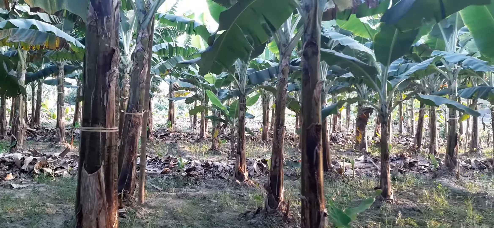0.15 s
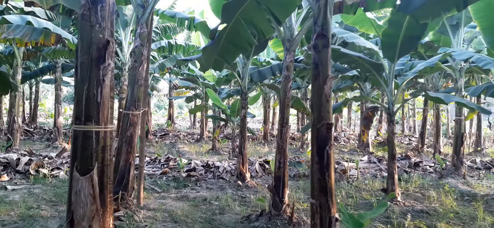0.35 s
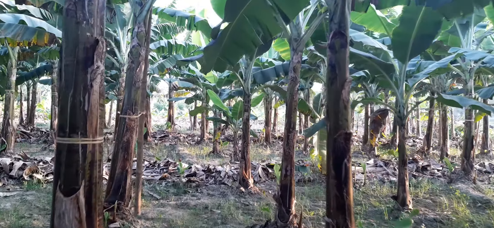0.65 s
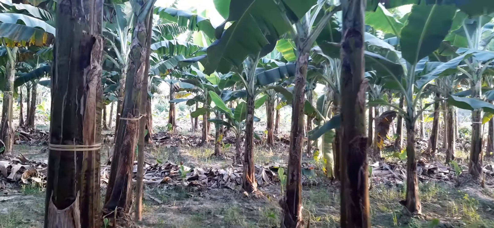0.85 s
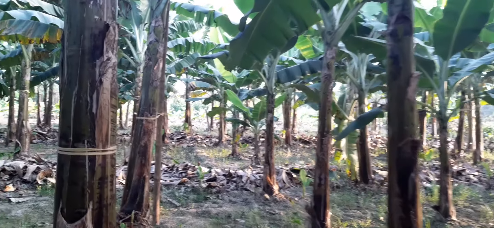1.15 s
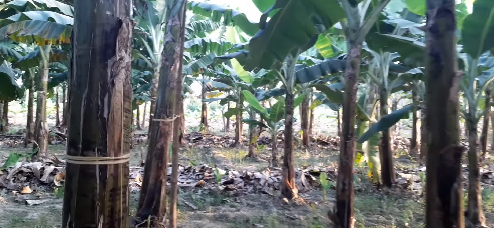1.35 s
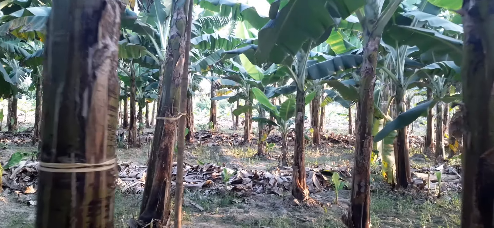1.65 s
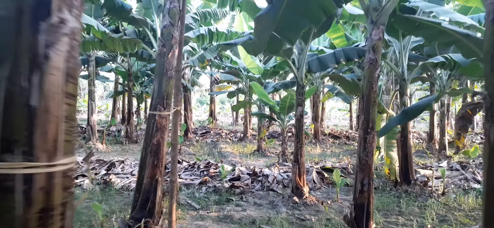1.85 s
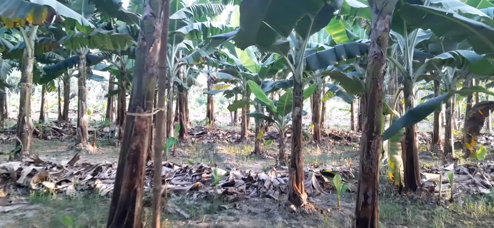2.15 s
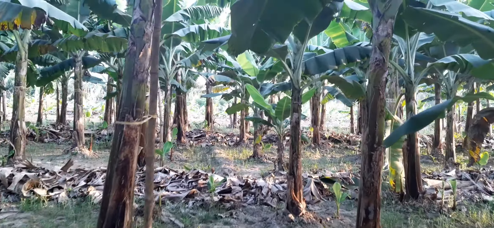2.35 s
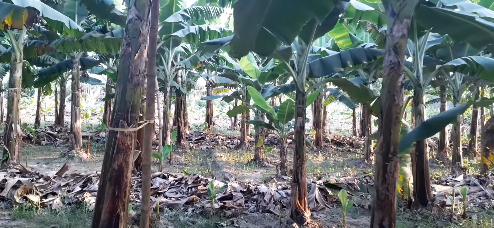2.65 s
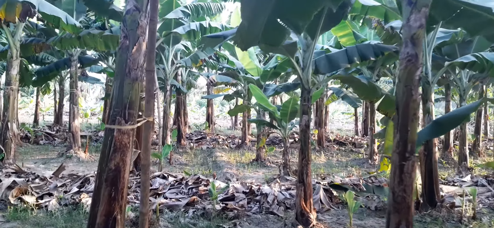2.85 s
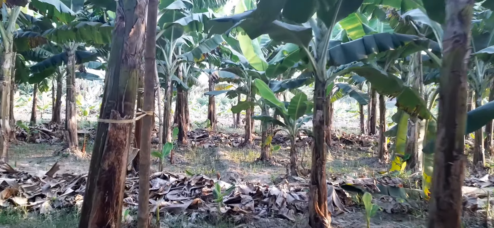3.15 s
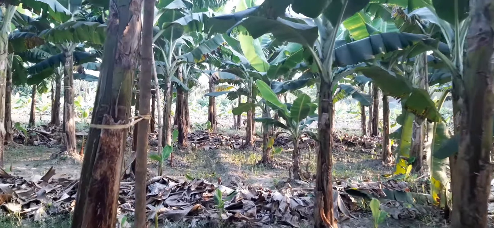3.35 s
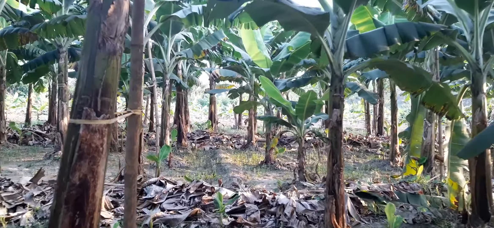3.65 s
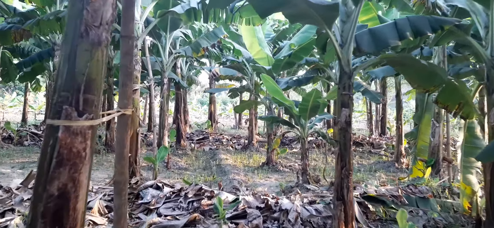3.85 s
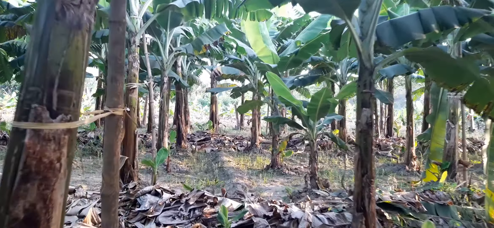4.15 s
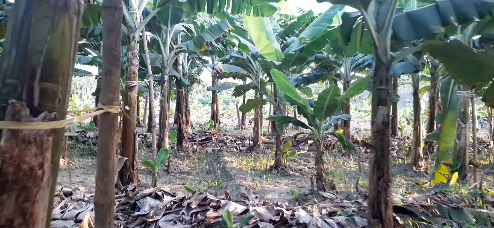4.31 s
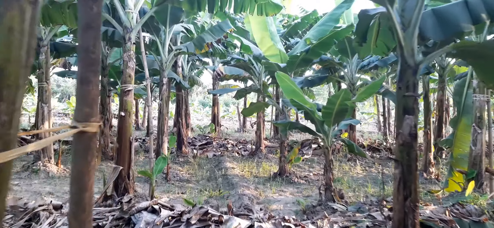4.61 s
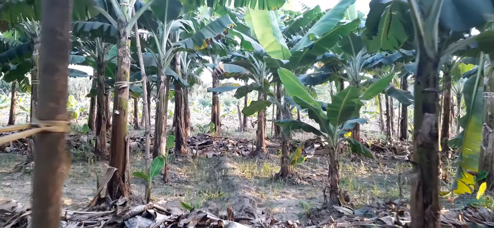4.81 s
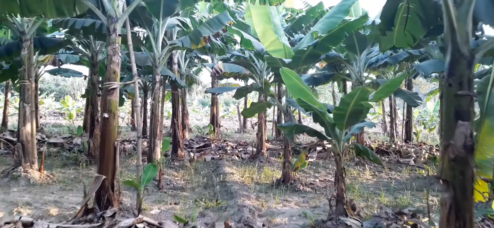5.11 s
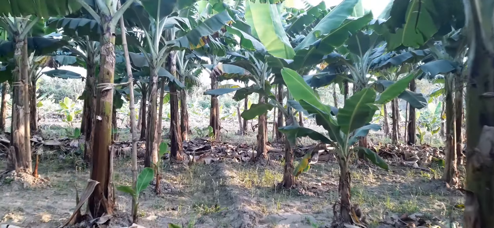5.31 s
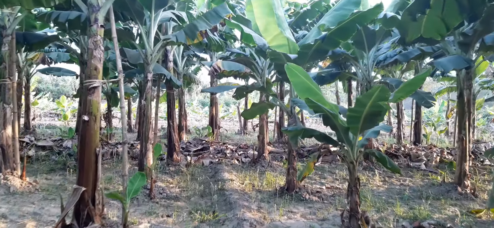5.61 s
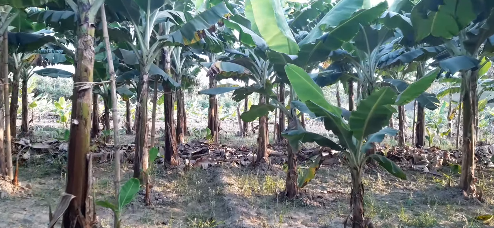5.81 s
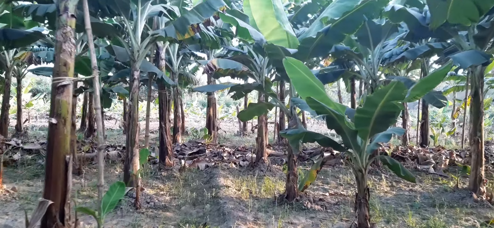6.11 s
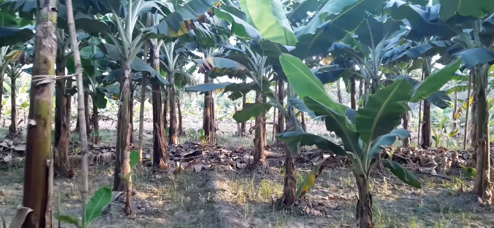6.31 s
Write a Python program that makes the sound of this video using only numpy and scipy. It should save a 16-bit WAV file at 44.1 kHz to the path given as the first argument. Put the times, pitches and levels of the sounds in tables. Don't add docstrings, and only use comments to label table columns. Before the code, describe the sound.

Feet wade through thick dry leaves, a quiet start bursting into loud crackling, snapping crunches, then thinning to softer uneven rustles in a banana plantation.

```python
import sys
import numpy as np
from scipy import signal
from scipy.fft import rfft, irfft, next_fast_len
from scipy.io import wavfile
from scipy.ndimage import map_coordinates

SR = 44100
rng = np.random.default_rng(int(sys.argv[2]) if len(sys.argv) > 2 else 0)


def materialize(psi):
    bounded = np.clip(np.atleast_2d(psi).T, -1, 1)
    quanta = np.round(bounded * 32767).astype(np.int16)
    wavfile.write(sys.argv[1], SR, quanta)


def gain_from_db(level_db):
    decades = np.asarray(level_db, float) / 20
    return 10 ** decades


N = 285327

# peak time in seconds, crackle level in dB,
# rise and fall in seconds per 20 dB.
HEAP_SURGES = [(1.018, -40.5, 0.014, 0.3), (1.096, -25.0, 0.045, 0.062), (1.169, -37.5, 0.025, 0.041),
               (1.231, -48.0, 0.018, 0.074), (1.393, -49.5, 0.072, 0.13), (1.46, -44.5, 0.036, 0.19),
               (1.542, -42.5, 0.12, 0.14), (1.66, -47.5, 0.049, 0.074), (1.782, -31.0, 0.061, 0.29),
               (1.843, -20.5, 0.079, 0.12), (1.909, -20.5, 0.16, 0.065), (2.004, -31.5, 0.036, 0.18),
               (2.041, -23.5, 0.029, 0.12), (2.085, -24.0, 0.074, 0.084), (2.188, -26.0, 0.087, 0.14),
               (2.3, -28.5, 0.084, 0.079), (2.384, -35.5, 0.099, 0.064), (2.488, -30.5, 0.24, 0.062),
               (2.576, -39.0, 0.07, 0.13), (2.68, -31.0, 0.017, 0.33), (2.731, -22.0, 0.07, 0.27),
               (2.859, -25.5, 0.06, 0.13), (2.95, -20.0, 0.042, 0.21), (2.995, -21.5, 0.069, 0.2),
               (3.2, -41.0, 0.13, 0.08)]
LITTER_SURGES = [(.19, -64.5, .035, .25), (.363, -64, .09, .12), (.507, -64.5, .12, .15),
                 (3.471, -46.5, .32, .12), (3.618, -47, .23, .7), (3.75, -47, .08, .3),
                 (3.855, -33.5, .075, .19), (4.03, -40, .17, .34), (4.183, -46, .13, .21),
                 (4.37, -54, .05, .4), (4.485, -45, .03, .12), (4.55, -54, .02, .12),
                 (4.689, -55, .07, .69), (4.85, -49, .15, .2), (5.003, -41.5, .36, .37),
                 (5.134, -33.5, .1, .24), (5.339, -47, .14, .26), (5.531, -52.5, .055, .7),
                 (5.615, -47.5, .022, .4), (5.72, -45.5, .12, .1), (5.785, -35.5, .04, .105),
                 (6.01, -56, .07, .15), (6.07, -48.5, .19, .16), (6.2, -57, .1, .3),
                 (6.298, -57, .012, .07), (6.405, -61, .02, .08)]
SURGE_DB, STIR_DB = -2.5, -83
# time in seconds, folds re crackle in dB,
# bed re crackle in dB.
UNDERFOOT = [(0, 12, 15), (.2, 2, -5), (.38, 9, 6), (.58, 2, 3), (.8, 14, 11), (1.05, 2, -3),
             (1.5, 2.5, -6), (1.9, 4, -7), (2.4, 3, -9), (2.72, 1, -2), (3.0, 1.5, -12), (3.3, 6.5, -1),
             (4.1, 7, -1), (4.7, 3, -6), (5.2, -1, -3), (5.7, 3, 2), (5.9, -4, -5), (6.3, 8, 5)]
# frequency in Hz, density in dB per Hz.
FLAKE_SPECTRUM = [(900, -64), (1800, -3), (2600, -3.5), (4300, -6), (7300, -10.5), (8400, -7.5),
                  (10000, -10), (12500, -7.5), (15500, -15)]
# frequency in Hz, gain in dB.
BLADE_COLOUR = [(250, -11), (500, -1), (680, -2), (830, 2), (1020, -1.5), (1400, 0.5), (1900, -1),
                (2600, 0.5), (4000, -6), (8000, -12.5)]
# frequency in Hz, density in dB per Hz.
BED_SPECTRUM = [(71, -35), (120, 4), (200, -8), (274, 11), (581, -5), (900, 5.5), (1170, -94), (1980, -120)]

# time in seconds, pitch in Hz, level in dB.
FALLING_CALL = [
    (0, 822, -66),
    (.06, 808, -62),
    (.12, 735, -65),
    (.18, 665, -66),
    (.3, 640, -66),
    (.36, 600, -66),
    (.39, 562, -68),
    (.47, 555, -69),
    (.53, 440, -80),
]
# time in seconds, pitch in Hz, level in dB.
LEVEL_CALL = [
    (.46, 950, -80),
    (.55, 820, -61),
    (.62, 780, -60),
    (.69, 814, -59),
    (.78, 870, -61),
    (.88, 860, -60),
    (.97, 800, -66),
    (1.02, 790, -90),
]
# multiple of the pitch, level in dB, flutter in knots per second.
FALLING_PARTIALS = [(1.07, -6, 80), (2.0, 0, 95)]
# multiple of the pitch, level in dB, flutter in knots per second.
LEVEL_PARTIALS = [(1.0, 0, 110), (1.64, -14, 220), (2.85, -20, 120)]

# frequency in Hz, density in dB per Hz.
RUMBLE_SPECTRUM = [(15, -33), (25, -38), (48, -5), (80, 3), (108, 3), (140, -2), (200, -18), (260, -48),
                   (440, -120)]
# frequency in Hz, density in dB per Hz.
AIR_SPECTRUM = [(88, -64), (150, 1), (270, 5), (601, 1), (805, 3), (1080, -22), (2000, -50), (4160, -27.5),
                (11000, -18.5), (16000, -47)]
# peak time in seconds, level in dB, half length in seconds per 20 dB.
HAND_JOLTS = [(.03, -57, .2), (.4, -56, .2), (.52, -54, .1), (1.12, -53, .2), (1.5, -54, .12),
              (2.0, -50, .1), (4.07, -55, .12), (4.5, -55, .15), (5.57, -54, .1), (1.7, -56, .3),
              (2.45, -54, .3), (3.2, -57, .3), (3.7, -54, .3), (3.95, -52, .5), (4.96, -44, .12),
              (5.3, -53, .7), (5.75, -51, .25), (6.08, -49, .25), (6.36, -55, .12)]
AIR_DB, BREEZE_DB, SHAKE_DB = -66, -63, -31

# time in seconds, peak in dB, blade re peak in dB, t60 in seconds.
RIB_SNAPS = [(1.086, -23, -3.5, .027), (1.1709, -21, -19, .015), (1.5344, -18.5, -12, .014),
             (1.7511, -10, -20, .01), (1.7739, -9, -6, .011), (1.8783, -9, -15, .012),
             (1.9977, -11, -11, .018), (2.0312, -13, -8.5, .011), (2.0444, -7, -5, .008),
             (2.0654, -5, -9, .018), (2.0834, -10, -7, .012), (2.1023, -9, -2, .006), (2.177, -7, -8, .015),
             (2.1828, -7, -3, .011), (2.22, -12, -9, .011), (2.2616, -13, -1, .014), (2.2873, -13, 0, .011),
             (2.2936, -7, -5, .009), (2.32, -12, -13, .007), (2.375, -3.5, -12, .01), (2.446, -10, -3, .01),
             (2.4689, -11, 2, .01), (2.4744, -6, -6, .006), (2.5769, -12, -9, .006),
             (2.6679, -25, 10, .021), (2.7198, -5.5, -20, .02), (2.8373, -8.5, -1, .013),
             (2.8557, -5, -6.5, .007), (2.937, -14, -4, .015), (3.022, -6.5, -12, .007)]
# time in seconds, peak in dB, blade re peak in dB.
LONE_TWIGS = [(.174, -56, -8), (.6699, -55, -3), (.839, -54, -7), (1.002, -43, -2), (.356, -54, 8),
              (1.2285, -33, -9.5), (1.3339, -36, -15), (1.3753, -33, -7), (1.3816, -24, -7),
              (1.4123, -32, -4), (1.449, -22, -11), (1.4927, -32, 4), (1.5137, -26, -14),
              (1.5635, -27.5, -7), (1.5738, -25, -8), (1.602, -25, -14.5), (1.6994, -30, -7.5),
              (2.4076, -22, -20), (2.4177, -15, -18), (2.429, -13, -10), (2.5511, -21, -2),
              (2.881, -13, -4.5), (3.4627, -31, 3.5), (3.9144, -20.5, -3), (4.004, -28, 0),
              (4.4767, -36, 3), (5.7642, -24.5, -9), (6.1097, -40, 2), (6.2938, -41, -5), (6.394, -43, -7)]
# frequency in Hz, gain in dB.
RIB_COLOUR = [(500, -9), (1500, -3), (3000, -0.5), (5000, -9), (9000, -6.5), (13000, -6.5), (16000, -18)]
TWIG_T60_S = .013

# time in seconds, peak in dB.
LEAF_CRUNCHES = [(0.351, -41), (0.399, -49), (0.483, -38), (1.001, -33), (1.16, -21), (1.382, -32),
                 (3.25, -27), (3.346, -36), (3.376, -32), (3.416, -31), (3.539, -35), (3.6, -33),
                 (3.656, -32), (3.693, -30), (3.721, -32), (3.831, -21), (4.004, -21), (4.08, -25),
                 (4.182, -31), (4.28, -35), (4.364, -38), (4.424, -41), (4.542, -31), (4.851, -30),
                 (4.935, -31), (5.465, -38), (5.603, -37), (5.656, -35), (5.685, -33), (6.165, -38)]
# frequency in Hz, gain in dB.
CRUNCH_COLOUR = [(150, -20), (300, -4), (800, 0), (1500, -3), (3000, -12), (6000, -30)]
CRUNCH_DB, CRUNCH_T60_S = 1.5, .045

# time in seconds, peak in dB, ring in Hz, t60 in seconds.
HOLLOW_POPS = [(.356, -34.5, 767, .011), (.482, -29, 807, .012), (1.0, -33.5, 619, .028),
               (1.086, -26.5, 840, .069), (1.16, -20, 806, .019), (1.428, -38, 813, .034),
               (1.484, -30, 790, .019), (1.644, -34, 870, .025), (1.689, -28, 895, .029),
               (1.732, -32, 1710, .025), (1.772, -14.5, 920, .015), (1.996, -16, 1900, .022),
               (2.066, -5, 1600, .011), (2.184, -16.5, 510, .052), (2.294, -12, 1530, .013),
               (2.364, -13, 2300, .0094), (2.445, -19, 646, .019), (2.666, -16.5, 730, .025),
               (2.837, -13, 1210, .015), (3.251, -21, 1130, .022), (3.415, -29, 670, .019),
               (3.599, -34, 920, .025), (4.004, -22, 540, .033), (4.183, -32, 1050, .025),
               (4.542, -32, 600, .011), (4.851, -36, 600, .03), (5.602, -38, 776, .037),
               (5.685, -24, 400, .009), (6.176, -43, 700, .01), (6.328, -19.5, 860, .008)]
# time in seconds, peak in dB, ring in Hz.
LITTER_LUMPS = [(3.204, -25, 1380), (3.272, -28, 528), (3.317, -35, 304), (3.391, -35, 821),
                (3.466, -31, 810), (3.694, -30, 993), (3.747, -32, 762), (3.789, -30, 834),
                (3.844, -21, 840), (3.894, -21, 1040), (3.916, -22, 837), (4.044, -24, 807),
                (4.057, -24, 678), (4.084, -28, 810), (4.209, -33, 816), (4.301, -39, 764),
                (4.336, -44, 301), (4.363, -40, 770), (4.423, -40, 851), (4.481, -33, 681),
                (4.524, -34, 536), (4.552, -43, 576), (4.741, -43, 301), (4.934, -30, 323),
                (4.954, -33, 810), (5.134, -28, 832), (5.154, -29, 716), (5.334, -37, 703),
                (5.464, -37, 853), (5.794, -34, 301), (6.007, -41, 301), (6.109, -37, 374),
                (6.141, -43, 320), (6.232, -42, 380), (6.271, -44, 721)]
LUMP_DB, LUMP_CYCLES = 0.5, 13

# peak time in seconds, level in dB, hollow in Hz,
# half length in seconds.
LEAF_DRAGS = [(0.51, -57, 220, 0.04), (1.094, -37, 560, 0.06), (1.817, -30, 300, 0.075),
              (1.834, -26, 940, 0.06), (1.873, -25, 1940, 0.06), (1.883, -23, 1100, 0.045),
              (1.916, -27, 1940, 0.045), (2.047, -25, 1600, 0.045), (2.084, -26, 1600, 0.018),
              (2.104, -25, 1060, 0.013), (2.162, -32, 1480, 0.03), (2.239, -35, 750, 0.018),
              (2.293, -29, 2160, 0.018), (2.376, -25, 2580, 0.011), (2.43, -33, 1410, 0.013),
              (2.474, -28, 2070, 0.023), (2.492, -34, 1500, 0.013), (2.505, -36, 1300, 0.013),
              (2.603, -41, 1130, 0.011), (2.635, -45, 2500, 0.038), (2.673, -34, 260, 0.018),
              (2.715, -33, 800, 0.075), (2.794, -34, 300, 0.12), (2.809, -31, 750, 0.06),
              (2.884, -30, 750, 0.045), (2.961, -32, 370, 0.075), (2.986, -27, 750, 0.075),
              (2.992, -28, 2290, 0.045), (3.039, -28, 750, 0.06), (3.105, -33, 950, 0.06),
              (3.148, -36, 850, 0.105), (3.276, -42, 600, 0.045), (3.773, -45, 900, 0.105),
              (3.847, -36, 790, 0.045), (3.916, -34, 790, 0.038), (4.008, -36, 560, 0.023),
              (4.04, -37, 780, 0.06), (4.086, -37, 730, 0.038), (4.121, -43, 1130, 0.045),
              (4.209, -45, 970, 0.045), (4.853, -45, 810, 0.03), (4.95, -44, 520, 0.06),
              (4.961, -47, 120, 0.09), (5.132, -44, 700, 0.075), (5.165, -48, 280, 0.105),
              (5.26, -49, 240, 0.075), (5.643, -53, 250, 0.06), (5.692, -45, 240, 0.045),
              (5.796, -45, 260, 0.045), (6.01, -50, 260, 0.105)]
DRAG_DB, DRAG_EDGE_DB = -2, 14
DRAG_WIDTH, DRAG_RISE, DRAG_TAIL = .4, .5, 1.3

# time in seconds, peak in dB.
FLAKE_TICKS = [(0.9787, -48), (1.0251, -30), (1.1144, -21), (1.1603, -25), (1.2585, -39), (1.3169, -44),
               (1.3339, -38), (1.3644, -31), (1.4794, -37), (1.5894, -32), (1.6452, -34), (1.6594, -39),
               (1.7115, -28), (1.7344, -15), (1.8074, -16), (1.9244, -20), (2.1444, -21), (2.5994, -41),
               (2.7394, -19), (3.0894, -21), (3.2044, -33), (3.4526, -33), (4.3645, -47), (4.4994, -46),
               (4.9494, -38), (5.0994, -30), (5.5994, -41), (6.0561, -42), (6.4028, -47)]
# frequency in Hz, gain in dB.
TICK_COLOUR = [(2500, -30), (5000, -6), (8000, 0), (13000, 0), (16000, -6)]
TICK_DB, TICK_T60_S = -3, .008

# frequency in Hz, t60 in seconds.
TRUNK_DECAY = [(200, 0.1), (1500, .16), (6000, 0.11), (15000, 0.13)]
# frequency in Hz, gain in dB.
MIC_RESPONSE = [(40, -41), (120, -7), (200, 0), (300, 1)]
# frequency in Hz, gain in dB.
BAND_LIMIT = [(15800, 0), (15980, -36), (16850, -42), (17000, -100)]


def unit(x):
    return x / np.sqrt(np.mean(x ** 2) + 1e-20)


def along(points, hz):
    f, v = np.transpose(points)
    return np.interp(np.log(hz + 1), np.log(f + 1), v)


def curves(rows):
    s, *cols = np.transpose(rows)
    return [np.interp(np.arange(N) / SR, s, c) for c in cols]


def wobble(rate):
    return map_coordinates(rng.standard_normal(N // 100), [np.arange(N) * rate / SR])


def filtered(x, spectrum):
    m = next_fast_len(N + 8192)
    gain = gain_from_db(along(spectrum, np.fft.rfftfreq(m, 1 / SR)))
    return irfft(rfft(x, m) * gain, m)[..., :N]


def coloured(x, spectrum):
    return unit(filtered(x, spectrum))


def noise(alike):
    a, b = rng.standard_normal((2, N))
    turn = np.arccos(np.clip(alike, -1, 1)) / 2
    shared, opposed = np.cos(turn) * a, np.sin(turn) * b
    return np.array([shared + opposed, shared - opposed])


def place(at, shapes, lag, pan_db):
    out = []
    for side in (1, -1):
        start = np.round(at + side * lag / 2).astype(int)
        where = start[:, None] + np.arange(shapes.shape[1])
        gain = gain_from_db(side * pan_db / 2)[:, None]
        port = np.bincount(np.clip(where, 0, N).ravel(), (gain * shapes).ravel(), N + 1)
        out.append(port[:N])
    return np.array(out)


def rings(hz, t60, size):
    t = np.arange(size) / SR
    return np.sin(2 * np.pi * hz[:, None] * t) * gain_from_db(-60 * t / t60[:, None])


def grains(count, size, hz, octaves, cycles, scatter_db, lag, spread, lean_db):
    at, big = rng.random((count, 2)).T
    pitch, way, lean = rng.standard_normal((count, 3)).T
    f = np.clip(hz * 2 ** (octaves * pitch), 80, 15500)
    strength = gain_from_db(-scatter_db * np.log(big + 0.0013)) * np.sqrt(f / hz)
    shapes = rings(f, cycles / f, size) * strength[:, None]
    return unit(place(at * N, shapes, lag + spread * way, lean_db * lean))


def collapses(count, scatter_db, t60):
    at, big = rng.random((count, 2)).T
    strength = gain_from_db(-2 * scatter_db * np.log(big + 0.0089))
    kicks = np.bincount((at * N).astype(int), strength, N)
    power = signal.fftconvolve(kicks, gain_from_db(-120 * np.arange(4000) / SR / t60))[:N]
    return unit(np.sqrt(np.abs(power) + 0.75 * np.mean(power)))


def swells(rows):
    s, db, rise, fall = np.transpose(rows)[:, :, None]
    t = np.arange(0, N + 64, 64) / SR
    tents = db - 20 * np.where(t < s, (s - t) / rise, (t - s) / fall)
    total_db = 10 * np.log10(np.sum(gain_from_db(2 * tents), axis=0) + 1e-12)
    return np.interp(np.arange(N) / SR, t, total_db)


def leaves():
    surge_db = swells(HEAP_SURGES + LITTER_SURGES) + SURGE_DB
    crackle_db = 10 * np.log10(gain_from_db(2 * surge_db) + gain_from_db(2 * STIR_DB))
    fold_db, bed_db = curves(UNDERFOOT)
    clump = collapses(count=1600, scatter_db=1.44, t60=0.087)
    clicks = grains(count=26000, size=32, hz=8800, octaves=0.85, cycles=3.0,
                    scatter_db=4.0, lag=-5.5, spread=6.5, lean_db=3.8)
    flakes = coloured(clicks + gain_from_db(5.0) * noise(0.08), FLAKE_SPECTRUM)
    flakes = unit(flakes * clump ** 0.65)
    folds = grains(count=14000, size=220, hz=1250, octaves=0.91, cycles=7.9,
                   scatter_db=1.25, lag=-5.0, spread=2.8, lean_db=2.2)
    folds = coloured(folds + gain_from_db(-5.0) * noise(0.38), BLADE_COLOUR)
    folds = unit(folds * clump ** 1.27 * gain_from_db(0.78 * wobble(60)))
    thuds = grains(count=2000, size=900, hz=278, octaves=0.5, cycles=5.2,
                   scatter_db=2.0, lag=-3.0, spread=3.2, lean_db=1.2)
    bed = unit(thuds + gain_from_db(-2.0) * coloured(noise(0.98), BED_SPECTRUM)) * clump ** 0.6
    mix = gain_from_db(1.9) * flakes + gain_from_db(fold_db - 3.1) * folds + gain_from_db(bed_db - 0.6) * bed
    return gain_from_db(crackle_db) * mix


def bird():
    out = 0
    for call, partials in ((FALLING_CALL, FALLING_PARTIALS), (LEVEL_CALL, LEVEL_PARTIALS)):
        hz, db = curves(call)
        phase = 2 * np.pi * np.cumsum(hz) / SR
        sounding = (np.arange(N) > call[0][0] * SR) & (np.arange(N) < call[-1][0] * SR)
        for multiple, partial_db, rate in partials:
            flutter = np.array([wobble(rate) + 1j * wobble(rate) for port in range(2)])
            whistle = np.real(flutter * np.exp(1j * multiple * phase))
            out = out + sounding * gain_from_db(db + partial_db - 3.5) * whistle
    return out


def air():
    stride_db = swells(HEAP_SURGES + LITTER_SURGES) + SHAKE_DB
    jolt_db = swells([jolt + jolt[-1:] for jolt in HAND_JOLTS])
    rumble_db = 10 * np.log10(gain_from_db(2 * BREEZE_DB) + gain_from_db(2 * stride_db) + gain_from_db(2 * jolt_db))
    gusts = gain_from_db(3.1 * np.array([wobble(14), wobble(17)]))
    port_db = np.array([[-2.4], [2.4]])
    rumble = unit(gusts * coloured(noise(.6), RUMBLE_SPECTRUM)) * gain_from_db(rumble_db + port_db)
    return rumble + gain_from_db(AIR_DB + wobble(20)) * coloured(noise(0.11), AIR_SPECTRUM)


def snaps():
    twigs = [twig + (TWIG_T60_S,) for twig in LONE_TWIGS]
    s, db, blade_db, t60 = np.transpose(RIB_SNAPS + twigs)
    t = np.arange(1500) / SR
    life = t / np.clip(t60, .003, .2)[:, None]
    tearing = rng.standard_normal((len(s), len(t)))
    tearing[:, 0] = -2.2
    way, lean = rng.standard_normal((len(s), 2)).T
    lag, pan_db = -5.5 + 4.5 * way, 1.0 + 1.9 * lean
    burst = tearing * (gain_from_db(-60 * life) + 0.11 * gain_from_db(-13 * life)) * gain_from_db(db - 5.0)[:, None]
    shake = tearing * (gain_from_db(-42 * life) + 0.16 * gain_from_db(-12 * life)) * gain_from_db(db + blade_db + 2.0)[:, None]
    ribs = filtered(place(s * SR, burst, lag, pan_db), RIB_COLOUR)
    blades = filtered(place(s * SR, shake, lag, pan_db), BLADE_COLOUR)
    return ribs + blades


def crunches():
    s, db = np.transpose(LEAF_CRUNCHES)
    t = np.arange(3000) / SR
    envelope = gain_from_db(-60 * t / CRUNCH_T60_S) * (1 - np.exp(-t / .001))
    puffs = rng.standard_normal((len(s), len(t))) * envelope * gain_from_db(db + CRUNCH_DB)[:, None]
    return filtered(place(s * SR, puffs, -4.5 + 0 * s, 0 * s), CRUNCH_COLOUR)


def pops():
    lumps = [(s, db + LUMP_DB, hz, LUMP_CYCLES / hz) for s, db, hz in LITTER_LUMPS]
    s, db, hz, t60 = np.transpose(HOLLOW_POPS + lumps)
    soft = 1 - np.exp(-np.arange(1600) / SR / 0.00056)
    shapes = soft * rings(hz, t60, 1600) * gain_from_db(db - 1.0)[:, None]
    return place(s * SR, shapes, -4.5 + 0 * s, -1.2 + 0 * s)


def drags():
    s, db, hz, half = np.transpose(LEAF_DRAGS)[:, :, None]
    size = 14400
    f = np.fft.rfftfreq(size, 1 / SR)
    t = (np.arange(size) - size // 2) / SR
    grit = rng.standard_normal((len(s), size)) ** 3
    way = rng.standard_normal(len(s))
    damping = 1j * f * hz * DRAG_WIDTH
    hollow = damping / (hz ** 2 - f ** 2 + damping)
    sound = irfft(rfft(grit) * hollow ** 2, size)
    reach = t / half / np.where(t > 0, DRAG_TAIL, DRAG_RISE)
    stroke = gain_from_db(db + DRAG_DB - DRAG_EDGE_DB * reach ** 2)
    rows = stroke * sound / np.std(sound, axis=1, keepdims=True)
    return place(s[:, 0] * SR - size // 2, rows, -4.5 + 4.5 * way, 0 * way)


def ticks():
    s, db = np.transpose(FLAKE_TICKS)
    t = np.arange(600) / SR
    clicks = rng.standard_normal((len(s), len(t))) * gain_from_db(-60 * t / TICK_T60_S) * gain_from_db(db + TICK_DB)[:, None]
    return filtered(place(s * SR, clicks, -5.5 + 0 * s, 0 * s), TICK_COLOUR)


def trunks(x):
    hz, t, z = signal.stft(rng.standard_normal((2, SR // 4)), SR, nperseg=256)
    apart = np.clip(hz / 6000, 0, 1)[:, None]
    z = np.array([z[0] + apart * z[1], z[0] - apart * z[1]])
    decay = gain_from_db(-60 * t / along(TRUNK_DECAY, hz)[:, None])
    tail = signal.istft(z * decay, SR, nperseg=256)[1]
    return signal.fftconvolve(x, tail / np.linalg.norm(tail[0]), axes=1)[:, :N]


def scene():
    near = leaves() + snaps() + crunches() + pops() + drags() + ticks()
    return filtered(near + gain_from_db(-11) * trunks(near), MIC_RESPONSE) + bird() + air()


def top_cut(x):
    return signal.sosfilt(signal.butter(12, 16990, fs=SR, output="sos"), x)


def record(dry):
    mix = filtered(dry, BAND_LIMIT)
    return top_cut(mix)


dry = scene()
out = record(dry)
materialize(out)
```